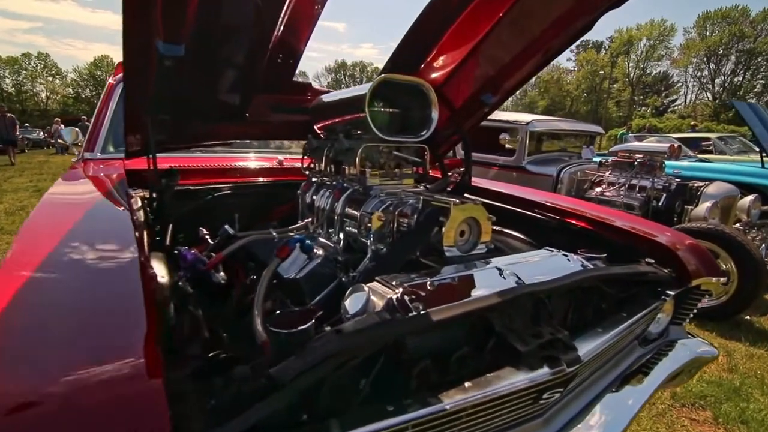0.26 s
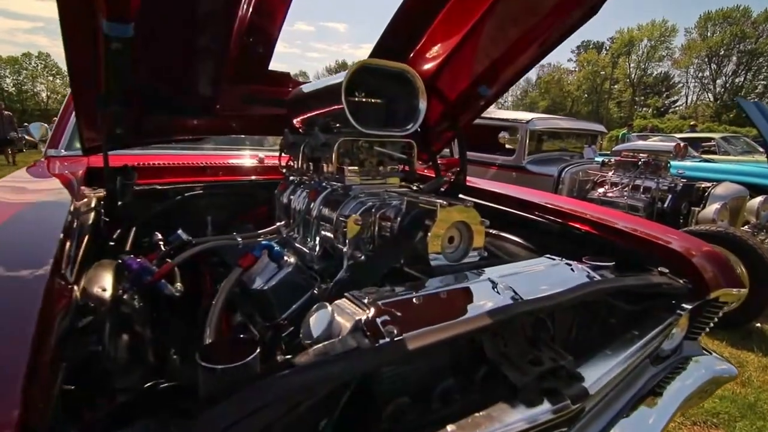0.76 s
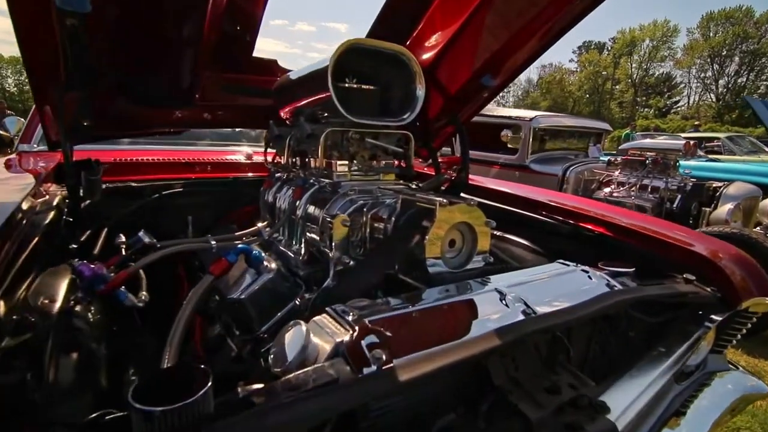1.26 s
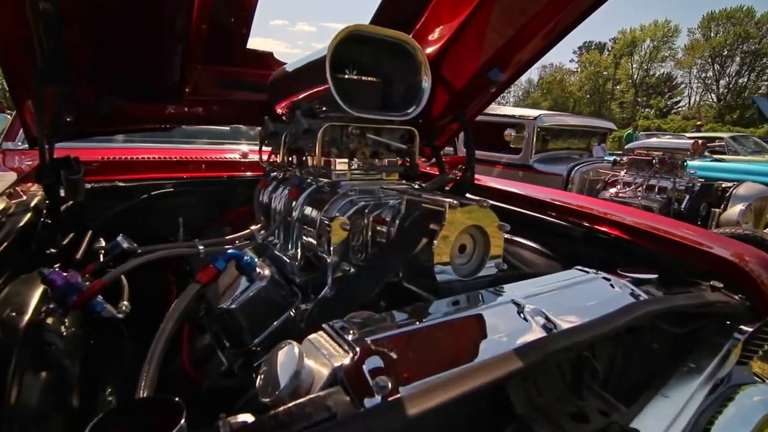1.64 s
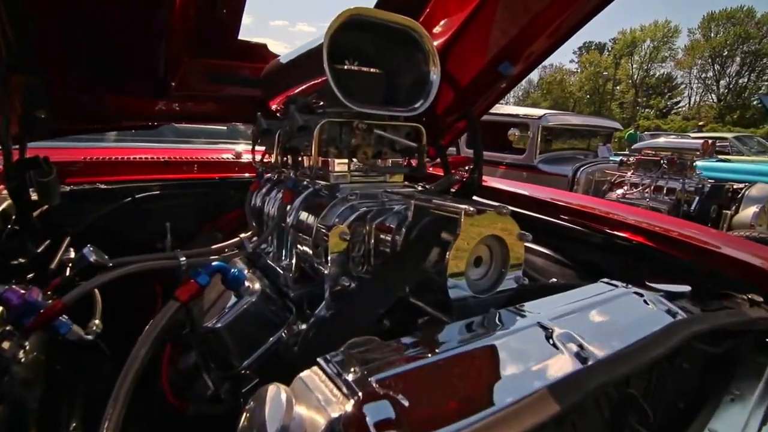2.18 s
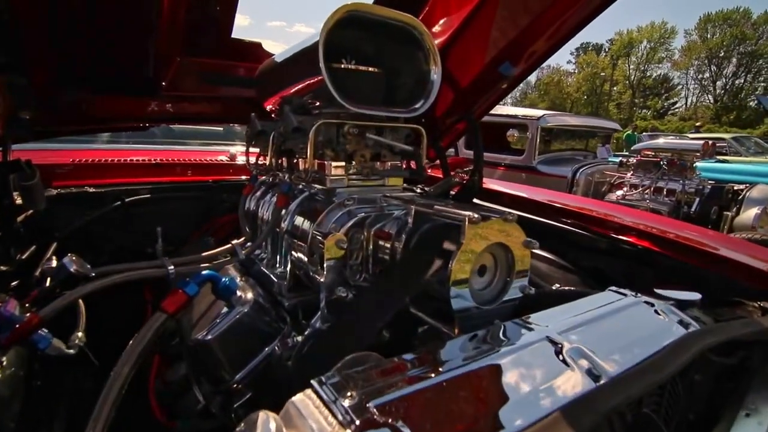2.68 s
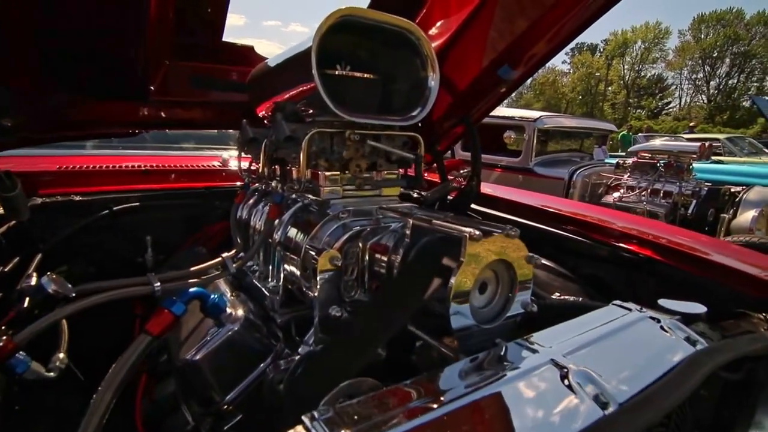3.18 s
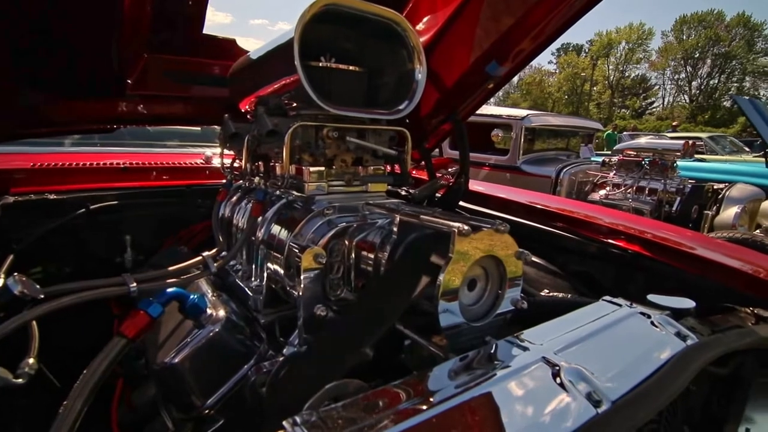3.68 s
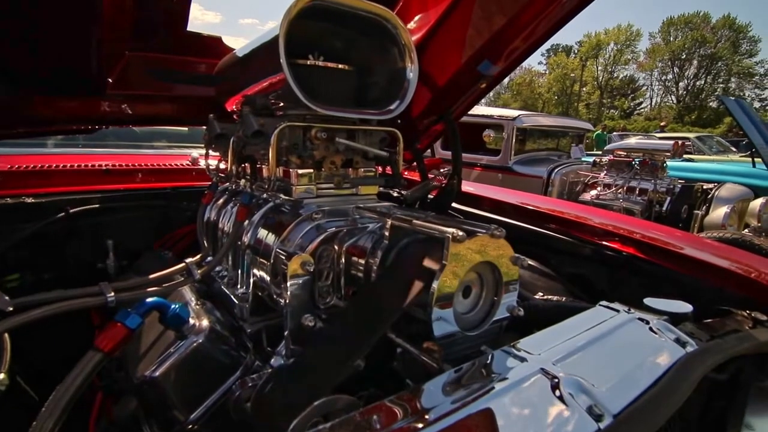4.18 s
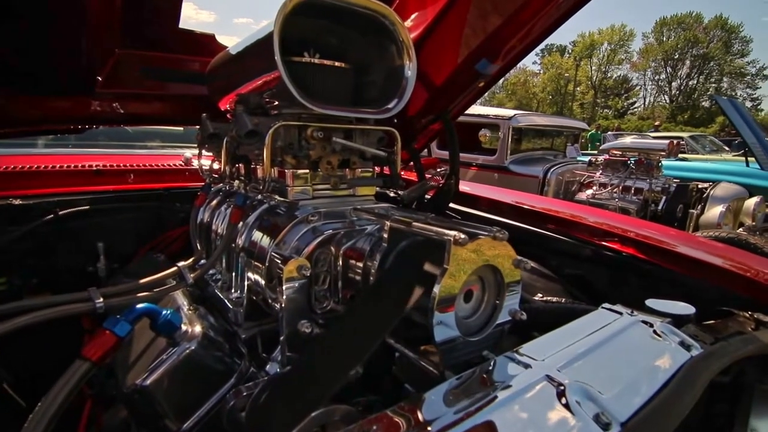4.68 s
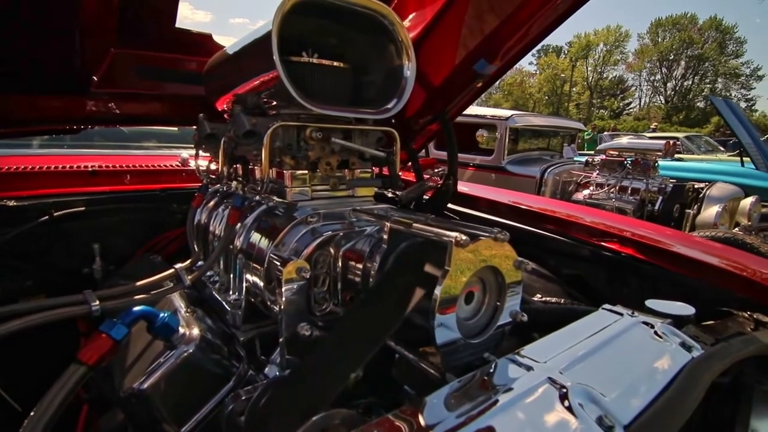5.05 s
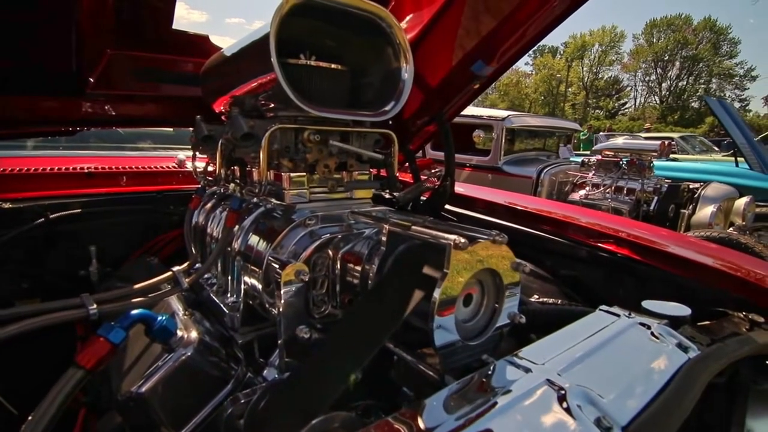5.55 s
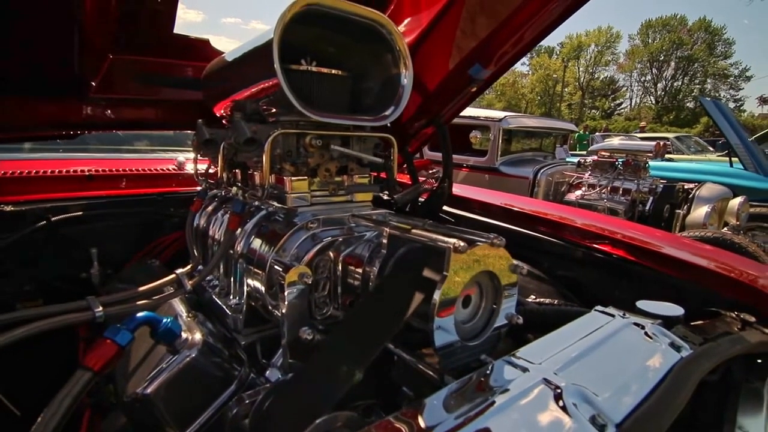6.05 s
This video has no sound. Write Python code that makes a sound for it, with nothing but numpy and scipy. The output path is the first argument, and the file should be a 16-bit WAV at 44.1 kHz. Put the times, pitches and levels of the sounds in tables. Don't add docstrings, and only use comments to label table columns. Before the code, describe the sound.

Close outdoor engine throb with blower hiss, two quick throttle revs that coast down, then an uneven, sputtering slow idle.

```python
import sys
import numpy as np
from scipy import signal
from scipy.fft import rfft, irfft, next_fast_len
from scipy.io import wavfile
from scipy.ndimage import uniform_filter1d, map_coordinates

SR = 44100
rng = np.random.default_rng(int(sys.argv[2]) if len(sys.argv) > 2 else 0)


def to_wav(sig):
    pcm = np.clip(np.atleast_2d(sig), -1, 1) * 32767
    pcm = np.round(pcm).astype(np.int16)
    wavfile.write(sys.argv[1], SR, pcm.T)


def invert_db(level):
    return 10 ** (np.asarray(level, dtype=float) / 20)


N = 278712

# time in seconds, speed in firings per second.
IDLE_SPEED = [(0, 85), (.1, 94), (.3, 126), (.45, 134), (.6, 129), (.8, 117.5), (1.03, 113.5), (1.4, 116),
              (2.2, 117.5), (3.2, 109), (4.5, 68), (4.8, 72), (5.04, 91), (5.25, 98.5), (5.5, 93),
              (5.7, 77.6), (5.97, 66), (6.32, 73)]
# time of the top in seconds, top firings per second, stretch of the rise (ratio).
BLIP_TOPS = [
    (2.485, 282, 1.14),
    (3.5, 284, 1),
]
# seconds from the top, share of top speed (0-1).
BLIP_SHAPE = [
    (-.26, .37),
    (-.17, .52),
    (-.055, .92),
    (0, 1.01),
    (.16, .82),
    (.33, .675),
    (.6, .443),
    (.75, .35),
    (1.05, .22),
]
# time in seconds, strength in dB beyond what the speed gives.
BURN_STRENGTH = [(0, 0), (.27, 3), (.65, -1.5), (.9, 0.5), (1.7, 2.5), (2.2, 2.5), (2.35, -1), (2.9, 1.15),
                 (3.3, -0.9), (3.9, 0.5), (4.3, -3.5), (4.65, 2.5), (5.2, 1.8), (5.5, 1), (5.8, 2.2),
                 (6.1, 1.1), (6.32, 2.5)]
# time in seconds, scatter from firing to firing (0-1).
SCATTER = [(0, .3), (.55, .3), (.8, .16), (1.1, .06), (2.1, .06), (2.3, .3), (2.46, .17), (3, .19),
           (3.15, .4), (3.38, .28), (3.48, .17), (4, .19), (4.2, .5), (4.6, .22), (5.1, .19), (5.45, .2),
           (5.65, .42), (6, .22), (6.32, .17)]
# time it catches in seconds, depth in dB, length in seconds.
MISFIRES = [(3.082, 5.5, 0.17), (3.197, 4.5, 0.053), (4.123, 5, 0.17), (4.357, 1.5, 0.029),
            (4.406, -0.5, 0.033), (4.544, 9, 0.093), (4.784, 4.5, 0.16), (5.349, 5, 0.055),
            (5.658, 7.5, 0.25), (5.703, 5, 0.033), (5.94, 5.5, 0.31), (6, 4, 0.05), (6.177, 2, 0.04)]
# time in seconds, exhaust lift in dB, intake lift in dB.
BARKS = [(.16, -12, 6.5), (.28, -2, -4), (.41, -2, 0), (.444, 3, -6), (.53, 6, -2), (.63, 6, 2),
         (1.33, 3, -6.5), (1.471, 2, -6.5), (2.267, 13, 9), (2.287, 9, 1), (2.412, 6, 10), (2.539, 1, 2),
         (2.679, 5, 2), (2.724, 8, -7), (2.748, 10, 8.5), (3.127, 2, 0.5), (3.27, 6.5, 7), (3.31, -1, 7.5),
         (3.39, -11, -3.5), (3.471, -18, -1), (3.529, 6, 10), (3.616, 0, -9), (3.699, 7, 1.5),
         (4.585, 13, 0), (4.649, 0, -1), (4.87, 4, -5), (5.121, 4, 5.5), (5.23, 2, 3), (5.38, -2, 2.5),
         (5.44, 6, 0.5), (5.541, 12, -4.5), (5.596, 14.5, 2), (5.693, 3, -2), (5.76, 4, -6), (5.913, 11, 4),
         (6.195, 10, -5)]
CYLINDER_FLOW = [0.52, 1.116, 0.67, 0.81, 0.72, 0.89, 0.72, 0.68]
ORDERS = [3, 4, 5, 6, 7, 8, 9, 10, 11, 12, 13, 14, 15, 16, 17, 18, 19, 20, 21, 22, 24, 25, 28, 29, 34, 36,
          37, 43, 50, 53, 55]
# level in dB at fast idle, dB more when revved, dB more at low idle.
ORDER_LEVELS = [(-8, 2, 4), (-23.5, 8.5, -3), (-10.5, 5, 0), (-5.5, 6.5, -4), (-17.5, 13, -6),
                (4.5, 4.5, -1), (-19, -1, -5), (-3, 1, -15), (-2, -12, -15), (-4, -10, -6.5),
                (-11.5, 8.5, 9), (-7, 5.5, -1), (-10, 6, 2.5), (2.5, -1, -3.5), (-3, -5, -2),
                (-21.5, -2, 14), (-20.5, 11, 12.5), (-7, 1, -8), (-1, -1, -2.5), (-20, 6, -6),
                (-10, 18, -8), (4.5, -11, -13), (-12, 0, -0.5), (-16.5, -1, 11.5), (-5.5, -3, -1),
                (-4.5, -7, -6), (6.5, -14, -9.5), (-17, -8, 2), (-4, -8, -9), (1, -8, -3), (1.5, -9, -1)]
# frequency in Hz, gain in dB.
PIPE = [(40, -36.5), (72, -28.5), (97, -6.5), (114, -18.5), (140, -4), (157, 3), (174, -8), (189, -21),
        (210, -8), (232, -2), (262, -7), (288, -12.5), (325, -16.5), (500, -18), (1500, -52.5)]
# frequency in Hz, width in Hz, level in dB.
HEADERS = [(344, 67, 1), (470, 24.3, 3.5), (535, 39, 0), (658, 170, -8.5), (803, 51, -0.5),
           (947.5, 22.4, -2.5), (1144, 65, -18.5), (1995, 100, -17.5)]
# frequency in Hz, level in dB per Hz.
RASP = [(150, -20), (250, -1.5), (289, -18.5), (364, -6.5), (417, -12.5), (540, -7.5), (620, -8.5),
        (818, -8), (1100, -17.5), (1290, -39.5), (2500, -33), (3250, -41), (5500, -120)]
# frequency in Hz, level in dB per Hz.
INTAKE = [(650, -20), (1100, -1), (1270, -7), (1500, -5.5), (1780, -11), (2130, -7.5), (2320, -10),
          (3300, -15), (4080, -17), (5750, -22.5), (9000, -26.5), (11700, -67), (19800, -120)]
# time in seconds, strength in dB.
TAPS = [(0.2744, -33.5), (0.377, -44.5), (0.3985, -40.5), (0.4364, -39.5), (0.5262, -39), (0.629, -48),
        (0.7068, -47), (0.7694, -47.5), (4.8289, -50.5), (4.9294, -44), (5.0144, -45), (5.0944, -51),
        (5.1357, -42), (5.182, -44.5), (5.2294, -45), (5.256, -41.5), (5.3033, -47.5), (5.3856, -41.5),
        (5.426, -45.5), (5.5244, -51), (5.5694, -49), (5.7594, -52)]
# frequency in Hz, width in Hz, level in dB.
VALVE_COVERS = [(2170, 170, 4.5), (4360, 840, -7), (6400, 1200, -25)]
# frequency in Hz,
# width in Hz, level of the added band in dB, time of the peak in seconds, span in seconds.
BAND_SWELLS = [(1225, 64, 7, 0.092, 0.59), (817, 41, 3, 0.039, 0.11), (728, 106, 1, 5.63, 1),
               (1990, 200, -6, 5.2, 0.93), (656, 99, 2, 3.5, 0.94), (421, 66, -5, 3.47, 0.83),
               (390, 330, 1.5, 3.36, 0.15), (268, 65, 3, 2.37, 0.041), (198, 73, -4, 0.91, 0.32),
               (210, 53, -2, 3.4, 0.11), (358, 13, -1, 5.25, 0.25), (136, 20, -4, 2.83, 0.089),
               (133, 16, -0.5, 3.86, .1), (240, 43, -1.5, 5.43, 0.027), (453, 54, 3.5, 2.37, .05),
               (80, 37, 2.5, 2.67, 0.11), (80, 36, 0, 4.13, 0.15), (249, 59, -4, 3.12, 0.04)]
# frequency in Hz, level in dB per Hz.
RUMBLE = [(13, -47), (22, -17), (54, -10.5), (75, -5), (98, -28), (160, -120)]
# frequency in Hz, likeness (0-1).
EAR_LIKENESS = [(30, .5), (100, .99), (550, .97), (1300, .85), (2500, .74), (5000, .45), (9000, .58),
                (14000, .76)]
# frequency in Hz, left minus right in dB.
LEFT_LEAN = [(60, 5), (180, 7), (550, 6), (1650, 6), (4970, 7), (15000, -0.5)]
# frequency in Hz, level in dB per Hz.
FIZZ = [(3530, -59), (6000, -51), (9230, 7), (13600, 5), (14800, 7.5), (15700, 4.5)]
# time in seconds, lift in dB, length in seconds.
GULPS = [
    (2.223, 6, 0.032),
    (3.22, 6, 0.031),
]
# time in seconds, change in dB, length in seconds.
FIZZ_DIPS = [
    (2.45, -3, .015),
    (2.595, -16, .016),
    (2.8, -5, .012),
    (3.31, -11, .012),
    (3.662, -12, 0.011),
    (3.73, -7, .012),
]

CRUISE_HZ = 116
GROWL_PER_OCTAVE_DB = 2


def unit(x):
    return x / np.sqrt(np.mean(x ** 2) + 1e-20)


def along(points, hz):
    f, v = np.transpose(points)
    return np.interp(np.log(hz + 1), np.log(f + 1), v)


def curves(rows):
    s, *columns = np.transpose(rows)
    return [np.interp(np.arange(N) / SR, s, column) for column in columns]


def wobble(rate):
    knots = rng.standard_normal(int(N * rate / SR) + 4)
    return map_coordinates(knots, [np.arange(N) * rate / SR])


def filtered(x, response):
    m = next_fast_len(N + SR // 2)
    return irfft(rfft(x, m) * response(np.fft.rfftfreq(m, 1 / SR)), m)[..., :N]


def resonance(hz, centre, width):
    return 1j * hz * width / (centre * centre - hz * hz + 1j * hz * width)


def causal(points, hz):
    cepstrum = irfft(np.log(invert_db(along(points, hz))))
    half = len(cepstrum) // 2
    cepstrum[1:half] *= 2
    cepstrum[half + 1:] = 0
    return np.exp(rfft(cepstrum))


def steady(x, span_s):
    return x / np.sqrt(np.abs(uniform_filter1d(x ** 2, int(span_s * SR))) + 1e-12)


def rush(spectrum, gate):
    def shape(hz):
        turn = np.arccos(np.clip(along(EAR_LIKENESS, hz), -1, 1)) / 2
        return invert_db(along(spectrum, hz)) * [np.cos(turn), np.sin(turn)]

    mid, side = filtered(gate * rng.standard_normal((2, N)), shape)
    return unit(np.array([mid + side, mid - side]))


def revs():
    t = np.arange(N) / SR
    speeds = [curves(IDLE_SPEED)[0]]
    after_top_s, share = np.transpose(BLIP_SHAPE)
    for s, top, slow in BLIP_TOPS:
        stretched = (t - s) / np.where(t < s, slow, 1)
        speeds.append(top * np.interp(stretched, after_top_s, share, left=0, right=0))
    return uniform_filter1d(np.max(speeds, axis=0), size=SR // 30)


def octaves_up():
    return np.log2(revs() / CRUISE_HZ).clip(0)


def firings():
    angle = np.cumsum(revs()) / SR
    at = np.flatnonzero(np.diff(np.floor(angle))) + 1
    chance = rng.standard_normal((4000, 2))[:len(at)]
    return angle, at, np.arange(len(at)) % len(CYLINDER_FLOW), chance


def held(values, angle):
    return values[np.clip(np.floor(angle).astype(int) - 1, 0, len(values) - 1)]


def loudness(base_db, octave_db, throttle_db, overrun_db, burn_share):
    snap_per_s, coast_per_s = 8.5, 1.5
    lag_s, catch_s = 0.033, 0.029
    t, octaves = np.arange(N) / SR, np.log2(revs() / CRUISE_HZ)
    gain = np.interp(t - lag_s, t, uniform_filter1d(np.gradient(octaves) * SR, size=SR // 12))
    throttle = np.clip(gain * 2 ** octaves / snap_per_s, 0, 1.4)
    overrun = np.clip(-gain / coast_per_s, 0, 1)
    starved = 0
    for s, db, length in MISFIRES:
        starved = starved + db * np.interp(t - s, [-length, 0, catch_s], [0, 1, 0])
    burn = burn_share * (curves(BURN_STRENGTH)[0] - starved)
    return base_db + octave_db * octaves + throttle_db * throttle + overrun_db * overrun + burn


def barks(column):
    rise_s, fall_s = .004, .008
    t = np.arange(0, N, 64) / SR
    lift = 0
    for row in BARKS:
        span = np.where(t < row[0], rise_s, fall_s)
        lift = lift + row[column] * np.exp(-np.abs(t - row[0]) / span)
    return np.interp(np.arange(N) / SR, t, lift)


def rasp_level():
    lope_db, lope_turn, ragged_db = 3, 0.25, 14
    scatter = curves(SCATTER)[0]
    lope = np.cos(2 * np.pi * (np.cumsum(revs()) / SR / len(CYLINDER_FLOW) + lope_turn))
    level = loudness(base_db=-43.5, octave_db=7.5, throttle_db=6, overrun_db=2.5, burn_share=1.5)
    ragged = ragged_db * (scatter.clip(0, .2) - .17)
    return level + barks(1) + ragged + lope_db * lope * (1 - 2 * scatter)


def hiss_level():
    level = loudness(base_db=-57.5, octave_db=10, throttle_db=6, overrun_db=1.06, burn_share=0.6)
    return level + barks(2)


def exhaust(angle, at, cylinder, chance):
    rise_hz = 65
    blur_order = 9
    waver_db, waver_turn = 1.5, .25
    cool = .95
    count, t, every = len(CYLINDER_FLOW), np.arange(N) / SR, slice(0, N, 8)
    speed, scatter = revs()[every], curves(SCATTER)[0]
    rising = uniform_filter1d(1. * (np.gradient(speed) > 0), size=300)
    revved = np.interp(speed - rise_hz * rising, (130, 185), [0, 1])
    low = np.interp(t, (4, 4.3), [0, 1])
    grid = np.arange(0, 2000, .5)
    pipe = causal(PIPE, np.arange(0, SR / 2 + .25, .5))[:len(grid)]

    def drift():
        knots = uniform_filter1d(rng.standard_normal(175), 2)
        return np.interp(t[every], np.arange(175) * .04, knots) * (1 + revved)

    cycle = 0
    for order, (db, revved_db, low_db) in zip(ORDERS, ORDER_LEVELS):
        gain = np.interp(order * speed / count / cool ** low[every], grid, pipe)
        gain *= np.exp(-(scatter[every] * order / blur_order) ** 2)
        gain *= invert_db(db + revved_db * revved + low_db * low[every] + waver_db * drift())
        gain *= np.exp(1j * waver_turn * drift())
        turns = order * angle[every] / count + rng.random()
        cycle = cycle + np.real(gain * np.exp(2j * np.pi * turns))
    cycle = signal.resample_poly(cycle, 8, 1)[:N]

    opening = 17 * (angle % 1)
    blows = scatter * held(chance[:, 0], angle) * opening * np.exp(-opening)
    warm_ring = filtered(blows * (1 - low), lambda hz: causal(PIPE, hz))
    cool_ring = filtered(blows * low, lambda hz: causal(PIPE, hz / cool))
    uneven = 30 * (warm_ring + cool_ring)
    level = loudness(base_db=-32, octave_db=4, throttle_db=0.85, overrun_db=-0.4, burn_share=1.22)
    return invert_db(level - 1.36) * steady(cycle + uneven, span_s=0.061)


def growl(angle, at, cylinder, chance):
    bite_per_octave = .12
    flow = np.array(CYLINDER_FLOW)[cylinder]
    bite = bite_per_octave * np.log2(revs()[at] / CRUISE_HZ)
    fronts = np.zeros(N)
    fronts[at] = flow - .76 + bite + .5 * curves(SCATTER)[0][at] * chance[:, 1]

    def ring(hz):
        modes = enumerate(HEADERS)
        total = sum((-1) ** k * invert_db(db) * resonance(hz, c, w) for k, (c, w, db) in modes)
        above_throb = (1j * hz / 280 / (1 + 1j * hz / 280)) ** 2
        return total * above_throb / (1 + 1j * hz / 2000) ** 2

    level = rasp_level() - 5.5 + GROWL_PER_OCTAVE_DB * octaves_up()
    return invert_db(level) * steady(filtered(fronts, ring), span_s=.14)


def gas(angle, at, cylinder, chance):
    chuff_db = 2
    strength = np.array(CYLINDER_FLOW)[cylinder] * invert_db(2.7 * chance[:, 1])
    puff = held(strength, angle) * np.sin(np.pi * angle) ** 2
    rasp_db = rasp_level() - 2.8 - GROWL_PER_OCTAVE_DB * octaves_up() + .8 * wobble(15)
    rasp = invert_db(rasp_db) * rush(RASP, 2.2 + puff)
    chuff = uniform_filter1d(held(chance[:, 0], angle), size=128)
    hiss_db = hiss_level() + chuff_db * curves(SCATTER)[0] * chuff
    hiss = invert_db(hiss_db + 0.92 * wobble(16) + 4.0) * rush(INTAKE, 13.0 + puff)
    return rasp + hiss


def clatter():
    tap_db, tap_s = -12.5, 0.0044
    spit, u = np.zeros(N + SR), np.arange(SR // 20) / SR / tap_s
    for s, db in TAPS:
        spit[round(s * SR):][:len(u)] += invert_db(db) * u * np.exp(1 - u)

    def ring(hz):
        return sum(invert_db(db) * resonance(hz, c, w) for c, w, db in VALVE_COVERS)

    noise = rng.standard_normal((3, N))
    pair = noise[0] + 0.35 * noise[1:]
    return invert_db(tap_db) * filtered(spit[:N] * pair, ring) / np.std(filtered(pair, ring))


def band_swells(engine):
    t = np.arange(N) / SR
    total = 0
    for centre, width, db, s, span in BAND_SWELLS:
        near = np.exp(-((t - s) / span) ** 2)
        band = filtered(engine, lambda hz: resonance(hz, centre, width))
        total = total + invert_db(db) * near * band
    return total


def rumble():
    return invert_db(-64.5 + 1.5 * wobble(2.1)) * rush(RUMBLE, 1)


def scene():
    burns = firings()
    engine = exhaust(*burns) + growl(*burns) + gas(*burns) + clatter()
    everything = engine + band_swells(engine) + rumble()
    return filtered(everything, lambda hz: invert_db(along(LEFT_LEAN, hz) * np.array([[.5], [-.5]])))


def top_cut(x):
    return signal.sosfilt(signal.butter(12, 15750, fs=SR, output="sos"), x)


def record(dry):
    top, knee = .068, 4
    pressed = invert_db(3.0) * dry * np.clip(np.arange(N, 0, -1) / 200, 0, 1)
    pressed = pressed / (1 + np.abs(pressed / top) ** knee) ** (1 / knee)

    def capsule(hz):
        bass = 1j * hz / 42 / (1 + 1j * hz / 42)
        return bass * np.abs(bass) * (1 + 1j * hz / 12000) / (1 + 1j * hz / 2600)

    fizz_db = -75.5 + 0.56 * (hiss_level() + 63.5)
    fizz_db += 0.96 * wobble(20) + 1.6 * wobble(36) + 1.5 * wobble(90)
    for s, db, length in GULPS + FIZZ_DIPS:
        fizz_db += db * np.exp(-((np.arange(N) / SR - s) / length) ** 2)
    fizz = invert_db(fizz_db + np.array([[.8], [-.8]])) * rush(FIZZ, 1)
    return top_cut(filtered(pressed, capsule) + fizz)


dry = scene()
out = record(dry)
to_wav(out)
```